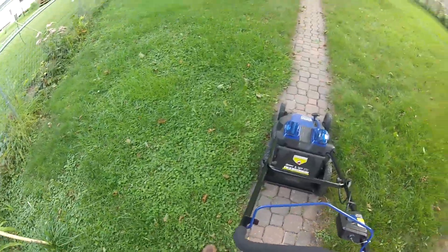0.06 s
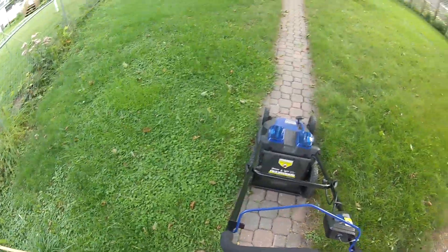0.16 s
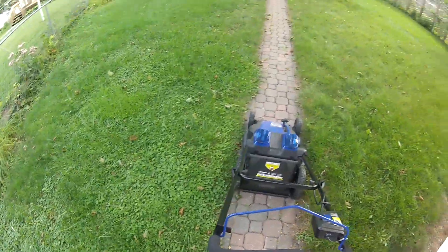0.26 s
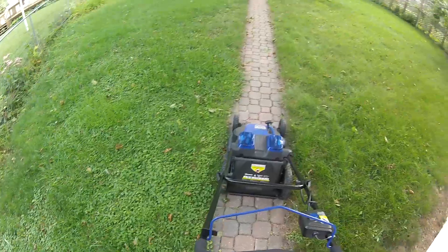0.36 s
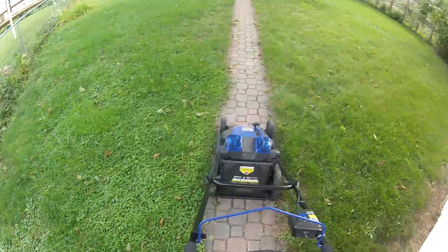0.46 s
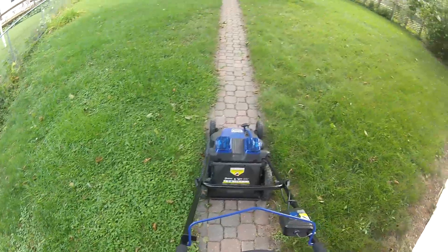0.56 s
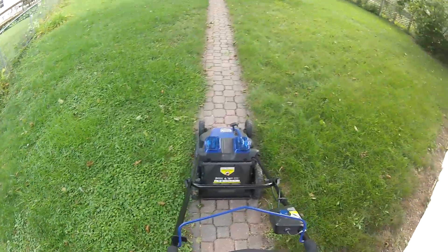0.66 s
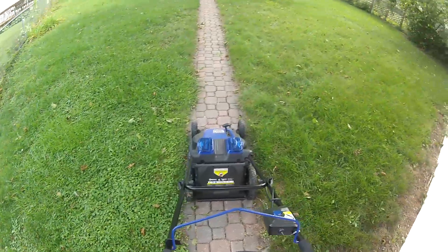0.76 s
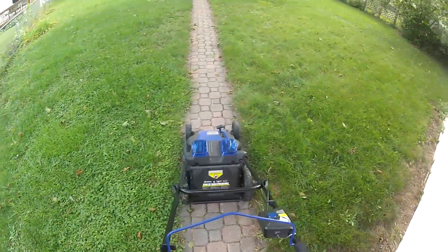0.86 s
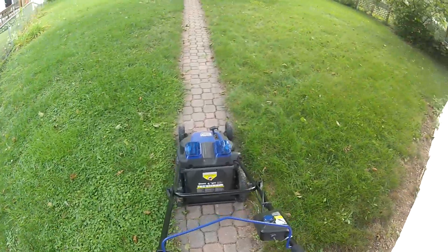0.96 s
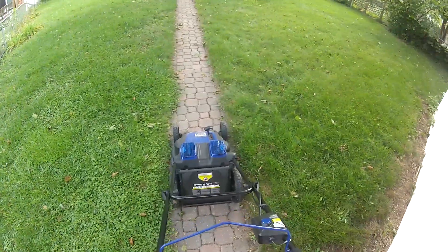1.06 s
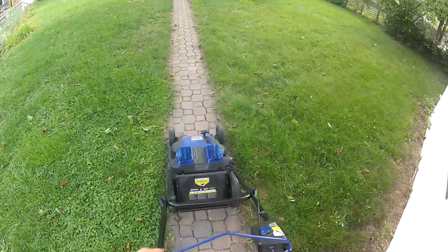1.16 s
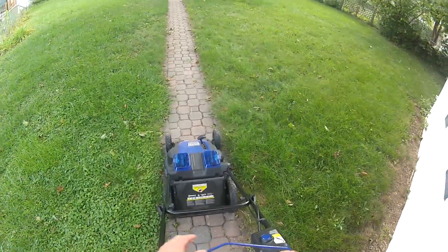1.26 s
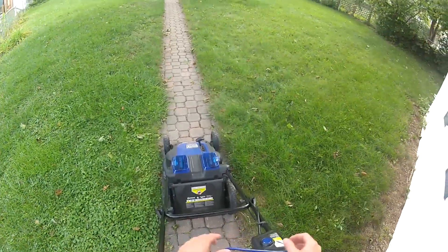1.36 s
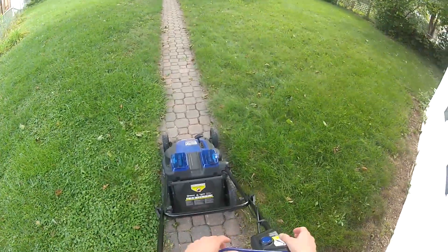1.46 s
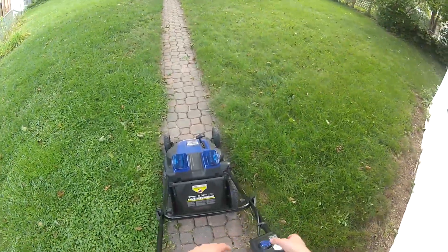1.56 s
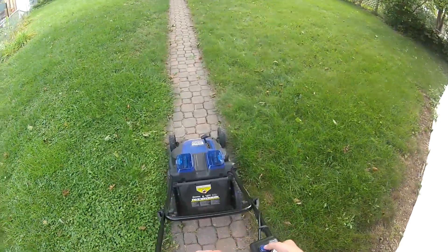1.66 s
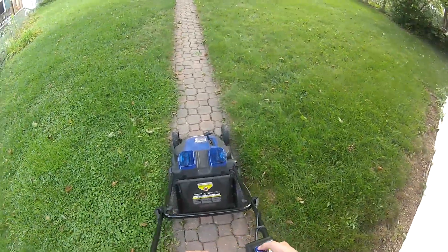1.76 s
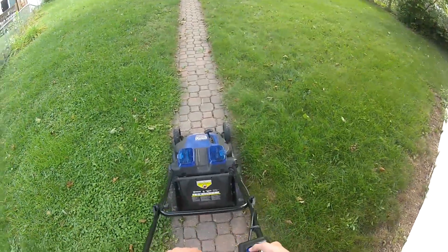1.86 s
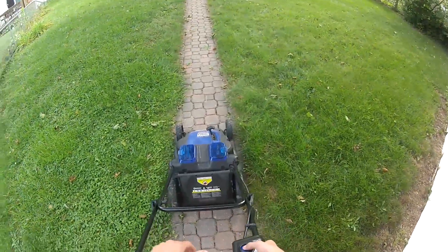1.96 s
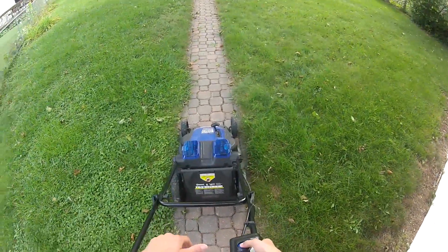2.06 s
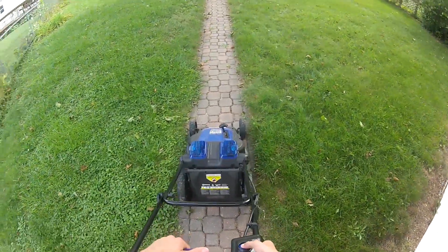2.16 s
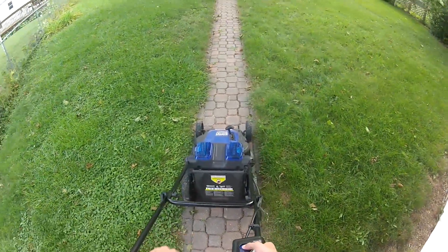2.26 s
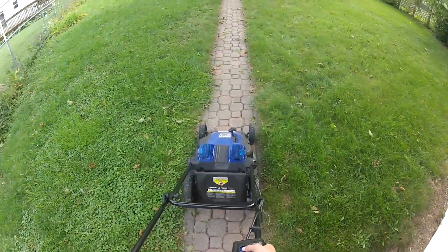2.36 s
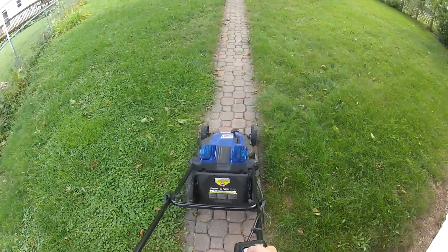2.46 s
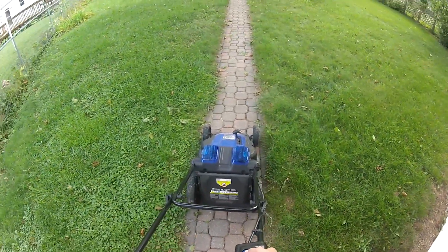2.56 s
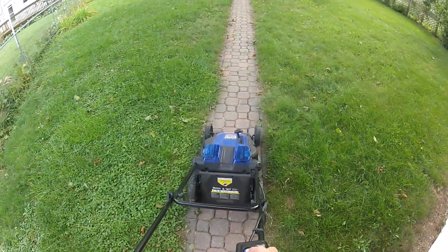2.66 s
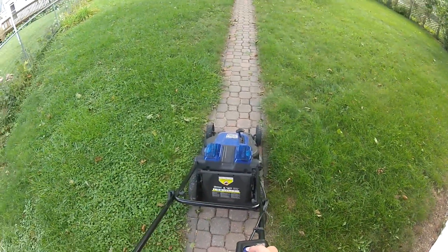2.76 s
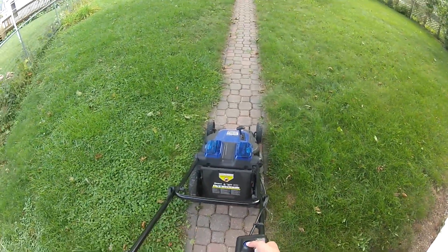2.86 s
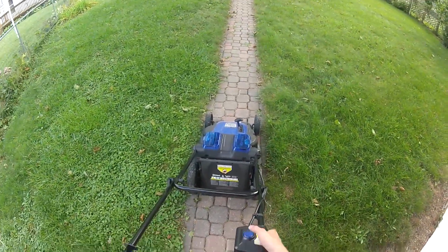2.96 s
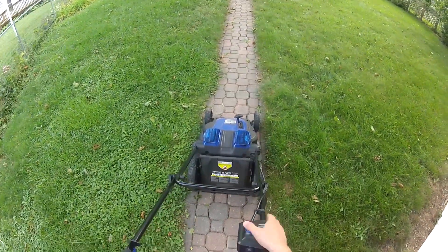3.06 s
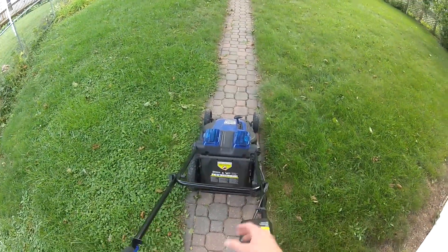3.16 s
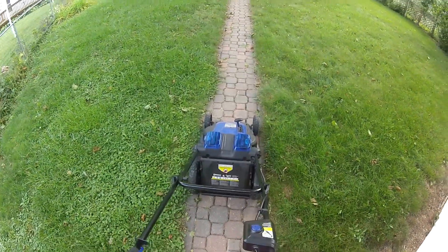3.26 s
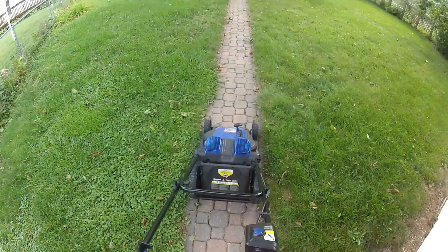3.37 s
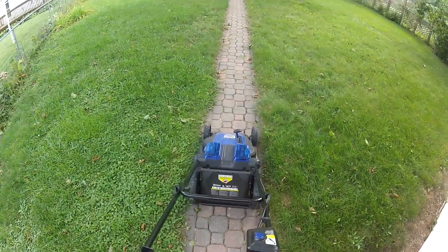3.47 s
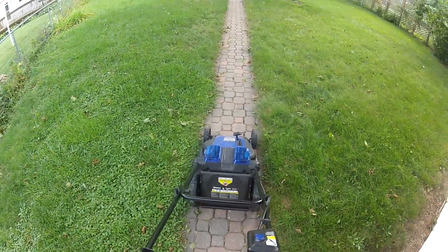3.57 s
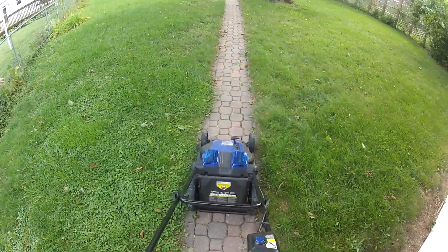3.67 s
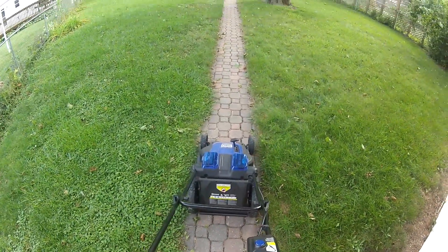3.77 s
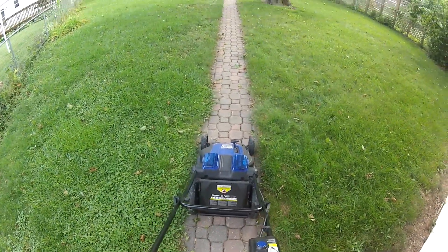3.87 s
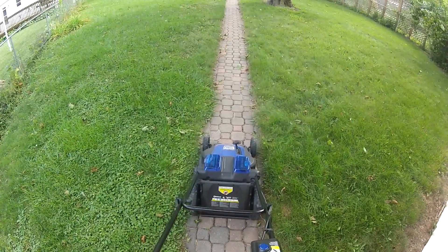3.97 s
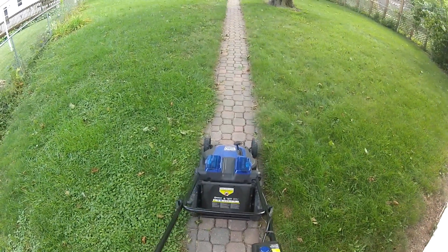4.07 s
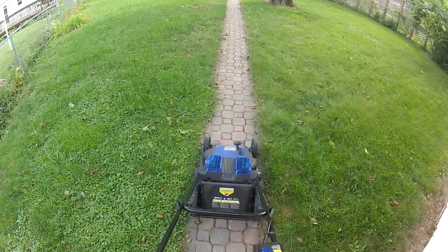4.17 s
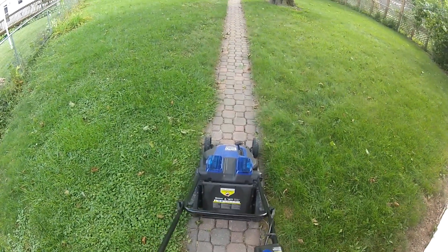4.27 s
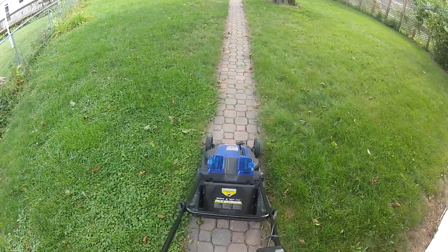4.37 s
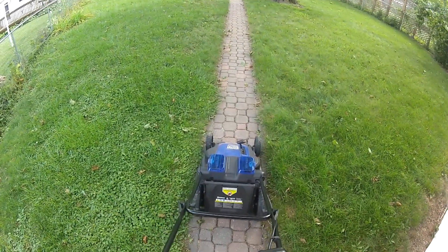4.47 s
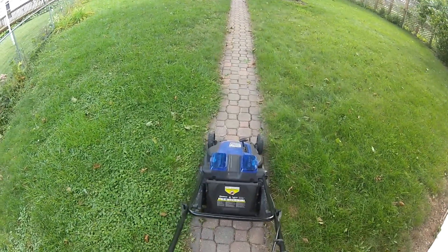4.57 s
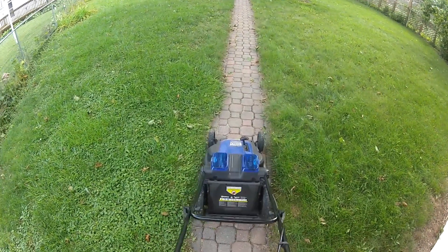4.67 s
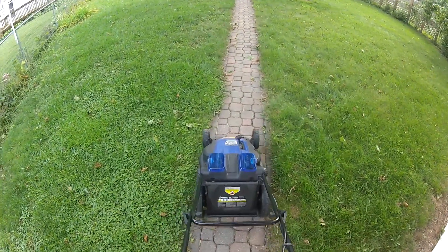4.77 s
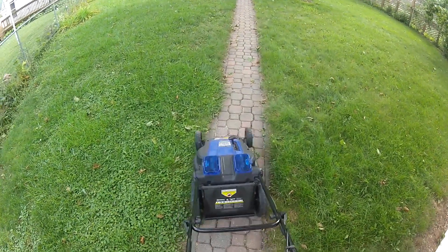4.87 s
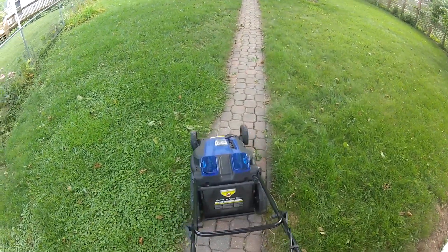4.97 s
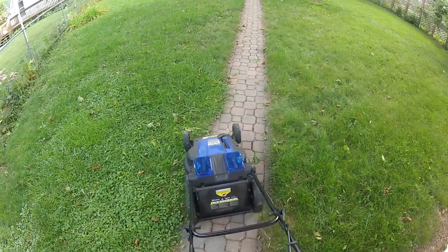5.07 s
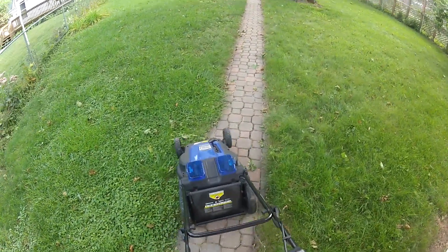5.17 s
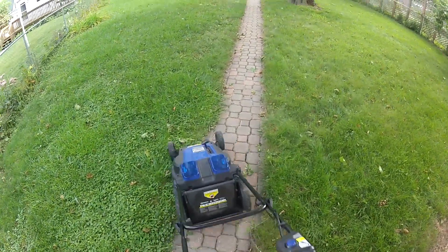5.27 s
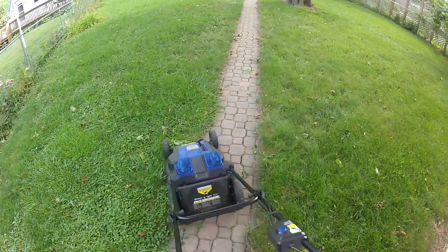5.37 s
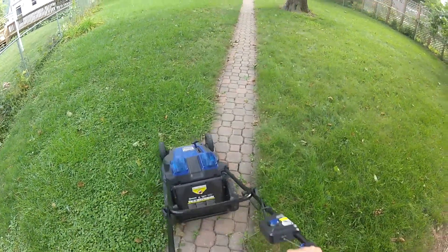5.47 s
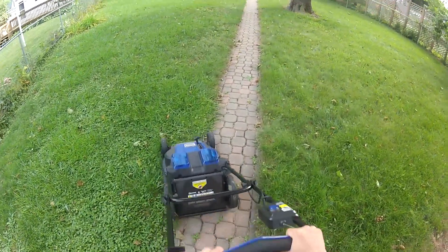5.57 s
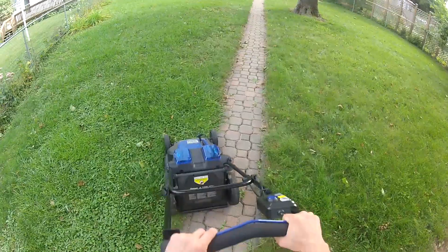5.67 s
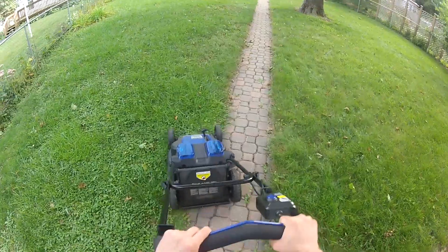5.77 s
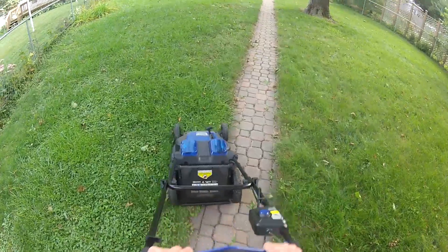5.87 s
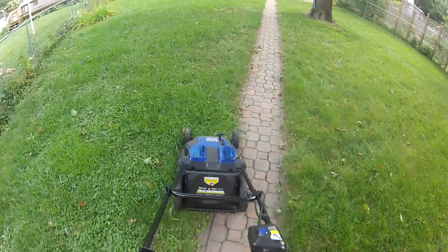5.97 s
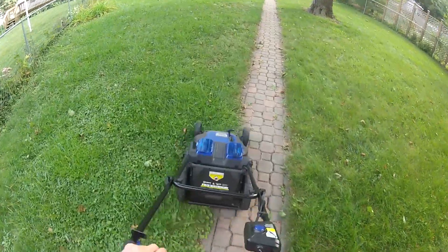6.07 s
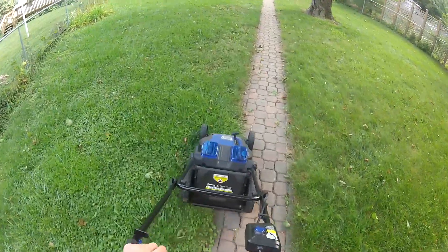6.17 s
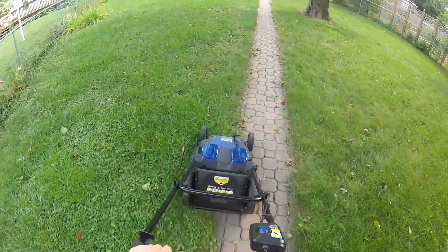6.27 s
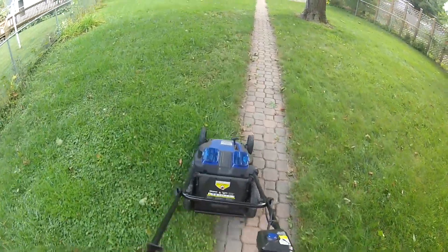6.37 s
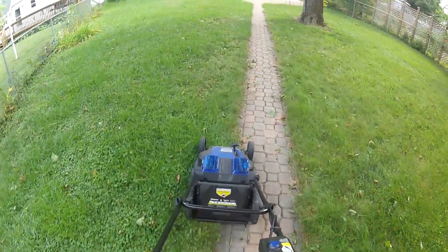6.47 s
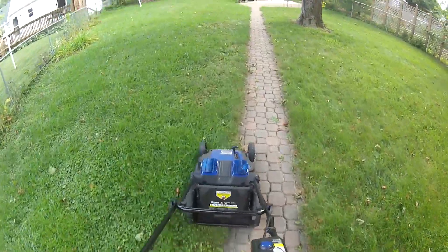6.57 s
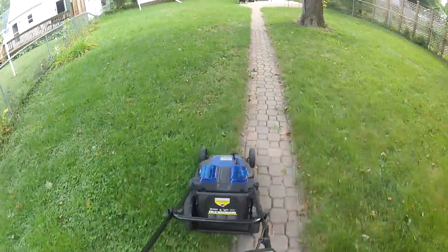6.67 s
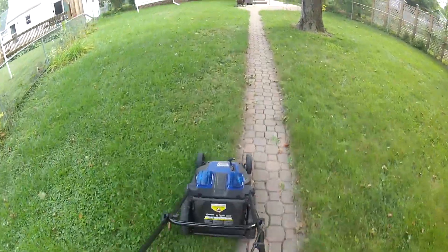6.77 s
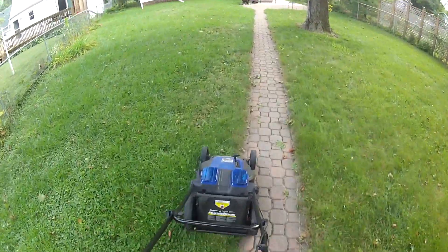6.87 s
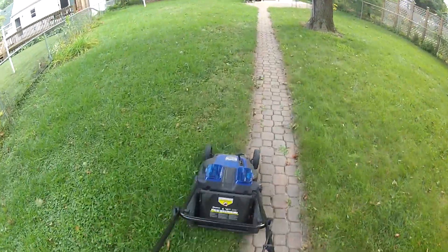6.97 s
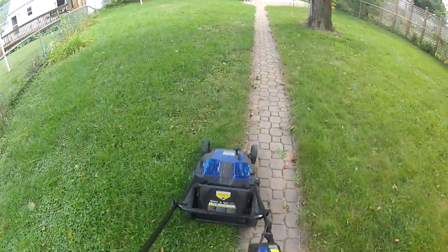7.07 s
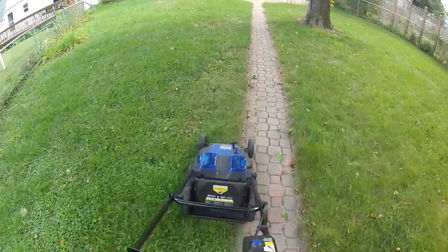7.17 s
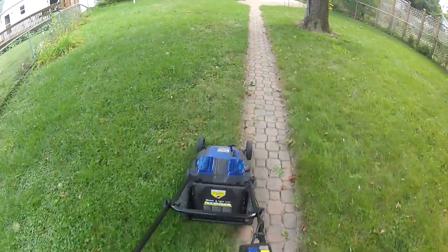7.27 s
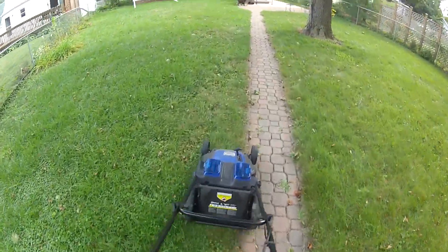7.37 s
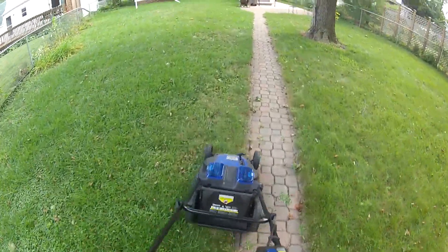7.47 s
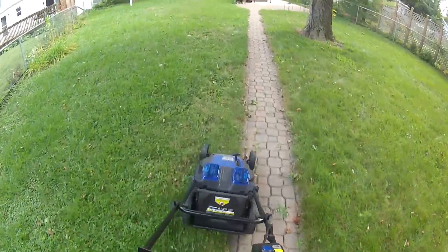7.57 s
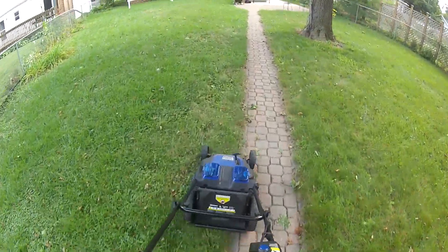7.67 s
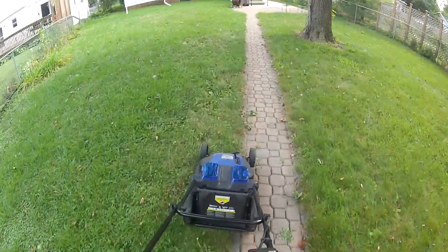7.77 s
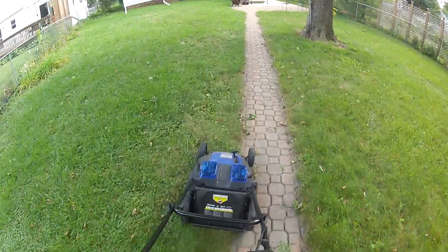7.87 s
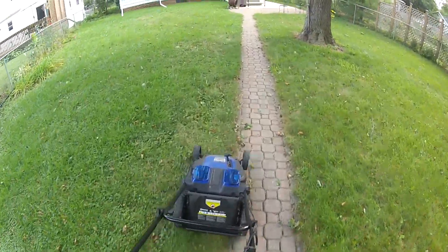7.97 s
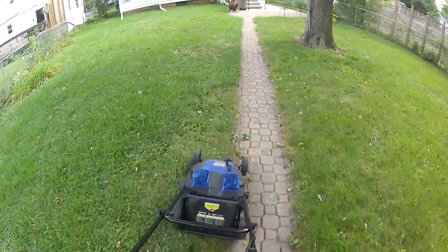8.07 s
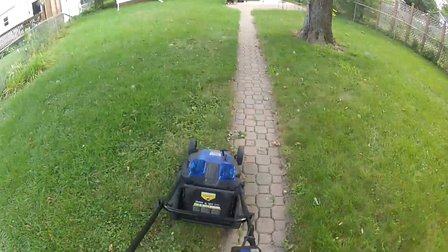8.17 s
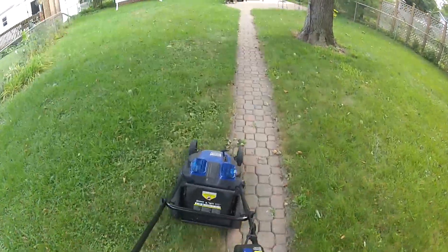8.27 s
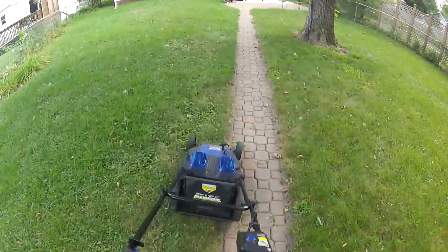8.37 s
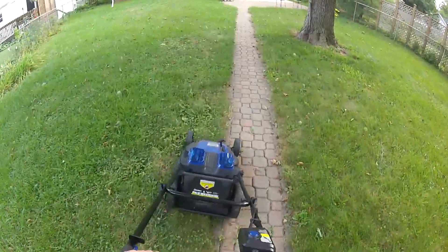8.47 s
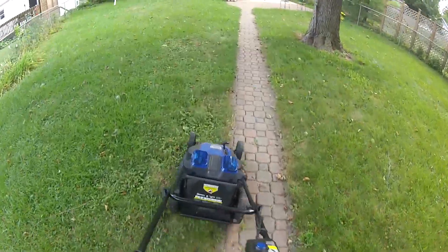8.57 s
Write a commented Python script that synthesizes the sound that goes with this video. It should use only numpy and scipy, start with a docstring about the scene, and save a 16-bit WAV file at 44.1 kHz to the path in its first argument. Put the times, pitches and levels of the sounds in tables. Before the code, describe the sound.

Insects trill in a quiet yard with a distant engine drone, then switch clicks start an electric mower that whirs up and begins cutting grass.

```python
"""Insects trill in a quiet yard while a distant engine drones, later falls in pitch and stops.
The switch and bail lever of a battery lawn mower on a brick path click, ringing the modes of its handle.
Its blade spins up: tones at multiples of the pass rate waver, and shaped noise roars and hisses.
Grit ticks on the steel deck as short noise bursts; near 5.5 s a tuft swells the hiss, then turf rumbles.
Late on the wheels thud off a brick edge and the blade speed sags, lowering the tones."""
import sys
import numpy as np
from scipy import signal
from scipy.fft import rfft, irfft
from scipy.io import wavfile
from scipy.ndimage import uniform_filter1d

SR = 44100
rng = np.random.default_rng(int(sys.argv[2]) if len(sys.argv) > 2 else 0)


def put_to_file(sound):
    """Save the sound as 16-bit audio at rate SR, in the file named by the first command-line argument."""
    columns = np.atleast_2d(sound).T  # one column per channel
    safe = np.clip(columns, -1, 1)
    whole_steps = np.round(safe * 32767)
    wavfile.write(sys.argv[1], SR, whole_steps.astype(np.int16))


def volts_from_decibels(level):
    """Turn decibel levels (scalar or array-like) into linear amplitude factors."""
    exponent = np.asarray(level, float) / 20
    return 10 ** exponent


N = 380141
TIME = np.arange(N) / SR  # s

# blade speed: time_s, passes_per_s
SPEED = [(2.45, 4), (3.3, 45.6), (3.58, 61.7), (4.04, 83.4), (4.22, 92.7), (4.8, 97.2), (5.5, 96.8),
         (7.75, 92.4), (8.1, 83.3), (8.62, 81.2)]
# share of the deck that stands over grass: time_s, share (0-1)
GRASS = [(4.9, 0.5), (5.4, 0.54), (6.2, 0.73), (7.4, 0.9)]
# level law of the roar: full_rate_db, per_tenfold_speed_db, over_grass_db
ROAR_LAW = (-17, 56.4, -3.1)
# relative spectrum of hiss, hard ticks and rustle: frequency_hz, density_db
HISS_SPECTRUM = [(2000, -6), (4000, -1), (7500, 10.5), (9500, 2.5), (15000, 6.5), (16000, -4)]
# relative spectrum of the tip rush and the body of ticks: frequency_hz, density_db
RUSH_SPECTRUM = [(1200, -9.5), (1900, 1), (2500, -2), (3200, -8.5), (8000, -16.5), (9500, -42)]
# stereo placing of the mower: frequency_hz, left_minus_right_db
MOWER_PAN = [(200, 1.5), (380, -2), (2400, -6.5), (4400, 0.5), (8100, 3.5), (15000, -5)]


def evened(x):
    """Normalization: scales a signal to rms 1."""
    return x / np.sqrt(np.mean(x ** 2) + 1e-20)


def read(points, hz):
    """Spectral interpolation: reads a table along a log-frequency axis."""
    f, value = np.transpose(points)
    return np.interp(np.log(hz + 1), np.log(f + 1), value)


def curve(rows, axis=1):
    """Linear interpolation in time of one column of a table."""
    rows = np.array(rows)
    return np.interp(TIME, rows[:, 0], rows[:, axis])


def sides(db):
    """Intensity stereo: left and right gains for a level difference."""
    return volts_from_decibels(np.array([[db / 2], [-db / 2]]))


def level_db(law):
    """Power law: level grows with the log of blade speed and shifts with the grass under the deck."""
    full_rate = 95  # passes per s
    full_db, per_tenfold_db, grass_db = law
    speed_db = per_tenfold_db * np.log10(curve(SPEED) / full_rate)
    return full_db + speed_db + grass_db * np.clip(curve(GRASS), 0, 1)


def drift(hz):
    """Narrow-band fluctuation: complex noise low-passed twice at the given corner."""
    r = np.exp(-2 * np.pi * hz / SR)
    z = rng.standard_normal(N) + 1j * rng.standard_normal(N)
    z = signal.lfilter([1], np.convolve([1, -r], [1, -r]), z)
    return z / np.sqrt(np.mean(abs(z) ** 2))


def noise(spectrum, same, pan, lead, patchy_db, size=1024):
    """Partly coherent stereo noise: random short-time spectra with patches drifting in time and frequency."""
    hz = np.fft.rfftfreq(size, 1 / SR)
    frames = 4 * N // size + 5
    a, b, c, d, patches = rng.standard_normal((frames, len(hz), 5)).T
    patches = evened(uniform_filter1d(uniform_filter1d(patches, 10, 0), 8, 1))
    like = np.clip(read(same, hz), -1, 1)[:, None]
    left = a + 1j * b
    shared = like * left * np.exp(-1j * read(lead, hz))[:, None]
    right = shared + np.sqrt(1 - like ** 2) * (c + 1j * d)
    tilt = volts_from_decibels(read(pan, hz) / 2)[:, None]
    gain = volts_from_decibels(read(spectrum, hz)[:, None] + patchy_db * patches)
    z = np.array([left * tilt, right / tilt]) * gain
    return evened(signal.istft(z, nperseg=size, noverlap=3 * size // 4)[1][:, :N])


def coloured(x, points):
    """Linear filtering: weights the spectrum of a sound by a table."""
    size = x.shape[-1] + 2048
    gain = volts_from_decibels(read(points, np.fft.rfftfreq(size, 1 / SR)))
    return irfft(rfft(x, size) * gain, size)[..., :x.shape[-1]]


def add(mix, s, sound):
    """Superposition: adds a stereo sound to the mix at time s."""
    part = mix[:, round(s * SR):][:, :sound.shape[1]]
    part += sound[:, :part.shape[1]]


def blade(fuzz=1.7, lag=0.98, waver_hz=3):
    """Blade-pass harmonics: steady tones, each with a fuzzy one just below from air swirling behind the blade."""
    multiples = (2, 3, 4, 6, 8)  # of the pass rate
    # how much each tone wavers and smears: blur (ratio)
    blurs = (.24, 1.0, .3, 1.8, 1.5)
    # nominal tone levels, a row a multiple: full_rate_db, per_tenfold_speed_db, over_grass_db
    tone_laws = [(-24.5, 127, -3.5), (-38.5, 60, -7), (-23, 80, -5), (-35, 67, -1), (-39, 60, -3)]
    # low deck resonance that lifts a passing tone: frequency_hz, width_hz, lift_db
    boom_hz, boom_width_hz, lift_db = (277.6, 30.4, 9.7)
    # tones set in once the swirl is orderly: threshold_passes_per_s, softness_passes_per_s
    threshold, softness = (62, 2.5)
    # motor windings: multiple of the pass rate, nominal_db, fluctuation_hz
    whine_multiple, whine_db, whine_width_hz = (57.5, -44, 12)

    speed = curve(SPEED)
    turns = np.cumsum(speed) / SR
    out = np.zeros((2, N))
    formed = 1 / (1 + np.exp((threshold - speed) / softness))
    for m, blur, law in zip(multiples, blurs, tone_laws):
        steady = np.exp(2j * np.pi * (m * turns + rng.random())) * (1 + blur * drift(1.46 * m))
        swirl = np.exp(2j * np.pi * m * lag * turns) * drift(waver_hz * np.sqrt(m))
        boom_db = lift_db / (1 + ((m * speed - boom_hz) / boom_width_hz) ** 2)
        gain = np.sqrt(2) * formed * volts_from_decibels(level_db(law) + boom_db) / np.sqrt(1 + blur ** 2)
        tone = gain * (steady + fuzz * blur * swirl).real
        out += tone * sides(read(MOWER_PAN, 95 * m))
    # the pass rate itself is weak and shaky
    fundamental = (np.exp(2j * np.pi * turns) * (0.71 + drift(3.4))).real
    out += volts_from_decibels(level_db(ROAR_LAW) - 22.0) * fundamental
    # the whine fades in with speed and fades out as the mower is pushed off
    heard = np.clip(6.5 - TIME, 0, 1) * np.clip(TIME - 3.8, 0, 1)
    carrier = np.exp(2j * np.pi * whine_multiple * turns)
    whine = np.array([(carrier * drift(whine_width_hz)).real for _ in out])
    out += volts_from_decibels(whine_db) * heard * whine
    return out * (TIME > SPEED[0][0])


def air():
    """Turbulence noise: air roars, throbs and rings the hollow deck; tips rush; clippings hiss and crackle."""
    # relative spectrum of the roar: frequency_hz, density_db
    roar_spectrum = [(90, -42), (200, -11.5), (380, -4), (470, -14), (800, -5.5), (1200, -4), (1700, -9.5),
                     (2500, -46)]
    # stereo coherence: frequency_hz, left_right_likeness (-1 to 1)
    same = [(130, 0.52), (640, 0.87), (1400, 0.8), (3100, 0.064)]
    # stereo phase: frequency_hz, left_lead_rad
    lead = [(300, -0.53), (1400, 0.57), (2800, 2.17)]
    # hollow under the deck: base_hz, fluctuation_hz, nominal_full_rate_db, per_tenfold_speed_db
    cavity_modes = [(700, 30, -35, 25), (1270, 30, -27, 52), (2150, 120, -31, 48)]
    # level laws: full_rate_db, per_tenfold_speed_db, over_grass_db; the hiss also swells in flurries
    rush_law = (-23, 71.6, -4.5)
    hiss_law = (-53.5, 63, 18.6)
    # a thick tuft is cut: time_s, half_length_s (to 1/e of the dB swell), swell_db
    tuft_s, tuft_half_s, tuft_db = (5.5, 0.053, 8.1)

    throb = 1 + 0.099 * np.cos(2 * np.pi * np.cumsum(curve(SPEED)) / SR)
    roar = noise(roar_spectrum, same, MOWER_PAN, lead, patchy_db=1.5) * volts_from_decibels(level_db(ROAR_LAW))
    rush = noise(RUSH_SPECTRUM, same, MOWER_PAN, lead, patchy_db=1.0) * volts_from_decibels(level_db(rush_law))
    # grass lowers the pitch of the hollow, uneven ground moves it
    more_grass = np.clip(curve(GRASS) - GRASS[0][1], 0, 1)
    sunk = np.cumsum(1 - 0.2 * more_grass + .02 * drift(3).real) / SR
    hollow = np.zeros(N)
    for hz, width_hz, db, per_tenfold_db in cavity_modes:
        mode = (np.exp(2j * np.pi * hz * sunk) * drift(width_hz)).real
        hollow += volts_from_decibels(level_db((db, per_tenfold_db, -6))) * mode
    hollow = hollow * sides(-4)
    # on average 60 specks per s, each with a 2.9 ms decay
    specks = (rng.random(N) < 60 / SR) * volts_from_decibels(1.1 * np.minimum(rng.exponential(1, N), 3))
    crackle = signal.lfilter([1], [1, -np.exp(-1 / (0.0029 * SR))], specks)
    flurries = volts_from_decibels(1.1 * drift(12).real + 2.8 * drift(90).real)
    flurries = flurries + crackle * np.clip(curve(GRASS), 0, 1)
    flurries = flurries * volts_from_decibels(tuft_db * np.exp(-((TIME - tuft_s) / tuft_half_s) ** 2))
    hiss = noise(HISS_SPECTRUM, same, MOWER_PAN, lead, patchy_db=1.0, size=256)
    hiss = hiss * flurries * volts_from_decibels(level_db(hiss_law))
    return ((roar + rush + hollow) * throb + hiss) * (TIME > SPEED[0][0])


def burst(t60, rise=0.00071, spike=0):
    """Impact noise: partly shared stereo noise rises fast and decays exponentially, led by a short spike."""
    t = np.arange(6000) / SR
    parts = rng.standard_normal((3, len(t)))
    fall = volts_from_decibels(-60 * t / max(t60, .005)) + spike * np.exp(-t / 0.0011)
    return (parts[:2] + 0.74 * parts[2]) * (1 - np.exp(-t / max(rise, 1e-4))) * fall


def bright(hit):
    """Hard contact excites high frequencies: treble with some body under it."""
    return evened(coloured(hit, HISS_SPECTRUM)) + 0.96 * evened(coloured(hit, RUSH_SPECTRUM))


def grit():
    """Impact sound: hard grit makes short bright ticks on the steel, wheels make a low thud."""
    # grit thrown against the deck: time_s, peak_db
    ticks = [(3.492, -20), (3.556, -21), (3.9076, -20), (4.9177, -10), (5.33, -13.5), (5.815, -16),
             (5.9116, -18.5), (6.639, -10), (6.884, -8), (6.911, -8.5), (7.022, -13), (7.127, -13.5),
             (7.3017, -9), (7.7491, -17), (7.7726, -9.5), (7.8357, -15), (7.9287, -15), (8.2018, -12.5),
             (8.532, -10.5), (8.6034, -11.5)]
    # wheels drop off a brick edge: time_s, peak_db
    drops = [(7.734, -10)]
    thud_spectrum = [(40, -28), (180, 8), (380, -6), (550, -3), (1500, -42)]  # frequency_hz, gain_db

    out = np.zeros((2, N))
    for s, peak_db in ticks:
        tick = bright(burst(0.15, rise=0.00029, spike=3.5))
        add(out, s, volts_from_decibels(peak_db) * tick / np.abs(tick).max())
    for s, peak_db in drops:
        thud = coloured(burst(0.2, rise=0.0083).mean(0), thud_spectrum)
        add(out, s, volts_from_decibels(peak_db) * np.array([thud, thud]) / np.abs(thud).max())
    return out


def handle():
    """Modal synthesis: each snap rings switch box and tube, mostly near its own pitch, under a bright crack."""
    # switch and lever: time_s, ring_peak_db (before panning), pitch_hz, crack_re_ring_db, t60_s
    clicks = [(1.722, -37, 1950, -35, 0.06), (1.917, -19, 1480, -6, 0.076),
              (2.291, -28.5, 2780, -22, 0.091), (2.311, -24.5, 1680, -7, 0.092),
              (2.331, -42, 2600, 11, 0.028), (2.4345, -13.5, 1330, 11.5, 0.1), (2.512, -17, 2500, 13, 0.12),
              (2.986, -22.5, 1770, -22, .04), (2.999, -14, 1530, -5, 0.074), (3.29, -17.5, 1120, 7, 0.13)]
    # switch box and tube: mode_hz, nominal_db, decay (share of the t60 of the click)
    modes = [(400, 3, 0.76), (1012, -12.5, 0.55), (1614, -4, 0.32), (2285, -4, 0.25), (2660, -5.5, 0.33),
             (3670, -7, 0.22)]

    out = np.zeros((2, N))
    t = np.arange(6000) / SR
    modes_hz, modes_db, lasting = np.transpose(modes)[:, :, None]
    for s, peak_db, hz, treble_db, t60 in clicks:
        # every blow lands a little differently
        grip = rng.standard_normal((2, len(modes), 1))
        off_pitch_db = 5 * np.log2(modes_hz / hz) ** 2
        struck_db = modes_db - off_pitch_db + 2.0 * grip[0] - 60 * t / (lasting * t60)
        rise = 1 - np.exp(-t * modes_hz / 2.5)  # low modes build up late
        waves = np.sin(2 * np.pi * modes_hz * (1 + 0.038 * grip[1]) * t)
        rings = (volts_from_decibels(struck_db) * rise * waves).sum(0)
        chatter_spectrum = [(.4 * hz, -28), (hz, 0), (2.5 * hz, -18), (9000, -40)]
        chatter = coloured(burst(t60, spike=2.5), chatter_spectrum)
        crack = bright(burst(0.6 * t60, rise=0.00051, spike=4.7))
        rings, chatter, crack = [v / np.abs(v).max() for v in (rings, chatter, crack)]
        snap = rings + 1.23 * chatter + volts_from_decibels(treble_db) * crack
        add(out, s, volts_from_decibels(peak_db) * sides(-3.5) * snap)
    return out


def insects():
    """Amplitude modulation: each trill is a train of wing strokes, every stroke a short fuzzy tone."""
    # two insects: pitch_hz, strokes_per_s, nominal_db
    wings = [(7820, 94, -53.5), (6840, 98, -55)]
    # trills: start_s, end_s, insect (row of the table above)
    trills = [(.08, .23, 1), (.27, .5, 0), (.52, .62, 1), (.89, 1.0, 1), (1.06, 1.3, 0), (1.33, 1.46, 1),
              (1.64, 1.82, 1), (2.68, 2.84, 1), (2.86, 3.19, 0)]

    out = np.zeros((2, N))
    for start, end, which in trills:
        hz, rate, db = wings[which]
        t = np.arange(0, end - start, 1 / SR)
        strokes = np.maximum(np.sin(2 * np.pi * rate * t) + .6, 0)
        strokes = strokes * signal.windows.tukey(len(t), .3)
        scrape = rng.standard_normal((2, 2, len(t)))
        scrape = signal.lfilter([1], [1, -np.exp(-np.pi * 250 / SR)], scrape)
        tone = 1.8 + evened(scrape[0]) + 1j * evened(scrape[1])
        add(out, start, volts_from_decibels(db) * strokes * (tone * np.exp(2j * np.pi * hz * t)).real / 2)
    return out


def distant_engine():
    """Frequency modulation: a wavering tone falls in pitch, its level following a table."""
    # level before panning and waver: time_s, level_db
    levels = [(0, -46), (.15, -33.5), (.35, -44.5), (.62, -38.5), (.89, -54.5), (1.05, -38.5), (1.85, -55),
              (2.3, -44), (2.75, -51), (3.43, -40), (3.6, -54), (3.75, -38.5), (5.1, -38.5), (6.35, -47.5)]
    start_hz, slows_from_s = 99.9, 2.6
    sag_hz, sag_bend = 6.5, 1.4  # fall = sag_hz x (seconds of slowing) ^ sag_bend
    engine_hz = start_hz - sag_hz * np.clip(TIME - slows_from_s, 0, 4) ** sag_bend
    drone = np.exp(2j * np.pi * np.cumsum(engine_hz) / SR) * (1 + .25 * drift(2.5))
    ending = np.clip(levels[-1][0] - TIME, 0, .1) * 10
    return np.sqrt(2) * drone.real * volts_from_decibels(curve(levels)) * ending * sides(-3.5)


def yard():
    """Ambient noise: a soft neighbourhood wash, rumble of wind and wheels on turf, and a clothing rustle."""
    # relative spectrum of the wash: frequency_hz, density_db
    wash_spectrum = [(30, -10), (150, -9.5), (450, -11), (2200, -18.5), (3900, -27.5), (7500, -18.5),
                     (9000, -35), (16000, -40)]
    # stereo coherence of the wash: frequency_hz, left_right_likeness (-1 to 1)
    wash_same = [(130, 0.46), (300, 0.78), (640, 0)]
    # stereo placing of the wash: frequency_hz, left_minus_right_db
    wash_pan = [(100, 2), (2400, -5.5), (9000, -3.5)]
    # wind on the microphone: time_s, peak_db (added to the steady rumble)
    gust_peaks = [(1.6, -44.5)]
    calm_db, gust_half_s = -54, 0.22  # steady wind; half length of a gust to 1/e
    # wheels roll over turf: start_s, rise_s, level_db
    roll_s, roll_rise_s, roll_db = (5.95, 0.19, -35.5)
    # clothing brushes: start_s, length_s, nominal_db
    brush_s, brush_length_s, brush_db = (.85, .28, -62)

    flat = [(100, 0), (1000, 0)]
    wash = noise(wash_spectrum, wash_same, wash_pan, flat, patchy_db=2.0, size=2048) * volts_from_decibels(-46)
    low = [(20, -16), (55, 0.0), (130, 3.0), (400, -74)]  # frequency_hz, density_db
    rumble = noise(low, [(40, 0.18), (120, 0.65)], flat, flat, patchy_db=3.0, size=4096)
    gusts = sum(volts_from_decibels(db) * np.exp(-((TIME - s) / gust_half_s) ** 2) for s, db in gust_peaks)
    rolling = volts_from_decibels(roll_db) * np.clip((TIME - roll_s) / roll_rise_s, 0, 1)
    rumble = rumble * (volts_from_decibels(calm_db) + gusts + rolling)
    rustle = coloured(rng.standard_normal((2, N)), HISS_SPECTRUM)
    rustle = rustle * volts_from_decibels(brush_db + 3.9 * drift(40).real)
    to_edge_s = np.minimum(TIME - brush_s, brush_s + brush_length_s - TIME)
    rustle = rustle * np.clip(to_edge_s / .04, 0, 1)
    return wash + rumble + rustle


def scene():
    """Superposition of mower, handle, insects, engine and yard."""
    return blade() + air() + grit() + handle() + insects() + distant_engine() + yard()


def low_pass(x):
    """Removes everything above the highest recorded frequency."""
    return signal.sosfilt(signal.butter(12, 16850, fs=SR, output="sos"), x)


def record(dry):
    """Band limiting by a linear-phase low-pass at 15750 Hz, then clipping at full scale."""
    lowpass = signal.firwin(511, 15750, window=("kaiser", 7), fs=SR)
    limited = signal.oaconvolve(dry, lowpass[None], "same")
    return low_pass(np.clip(limited, -1, 1))


dry = scene()
out = record(dry)
put_to_file(out)
```